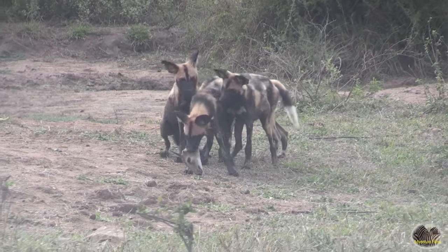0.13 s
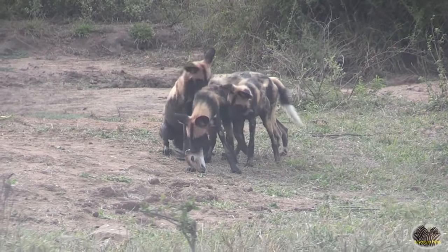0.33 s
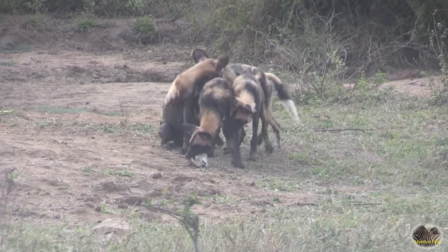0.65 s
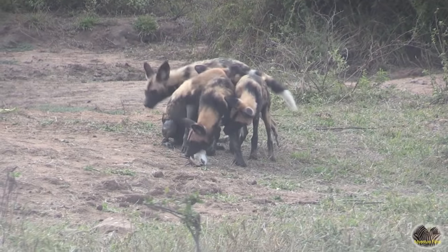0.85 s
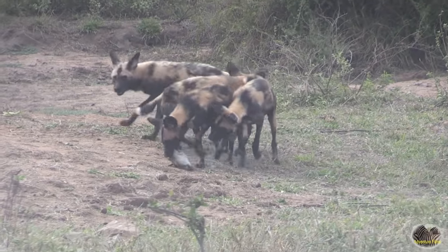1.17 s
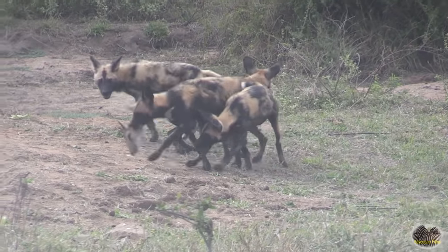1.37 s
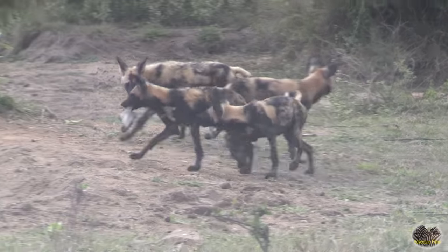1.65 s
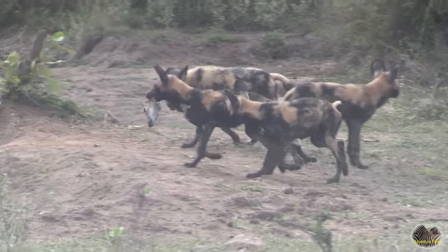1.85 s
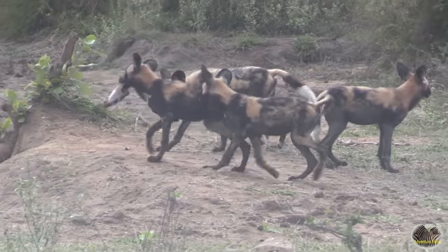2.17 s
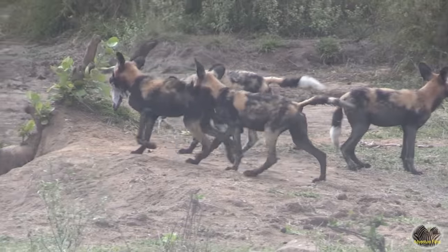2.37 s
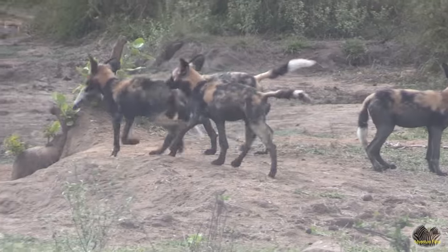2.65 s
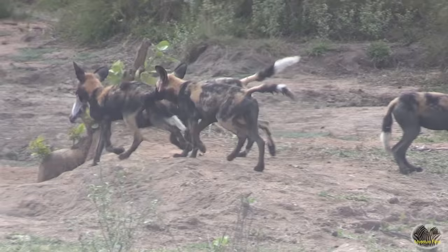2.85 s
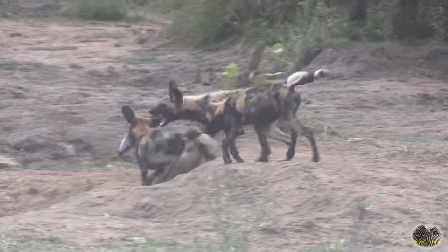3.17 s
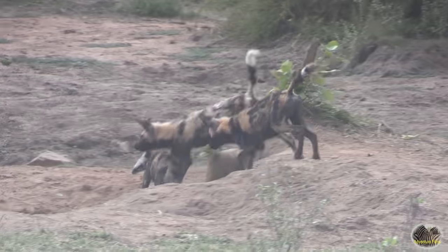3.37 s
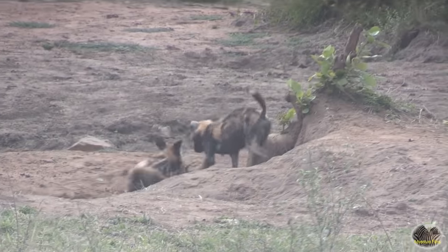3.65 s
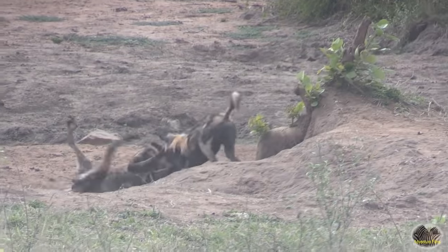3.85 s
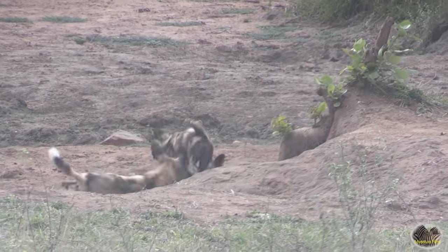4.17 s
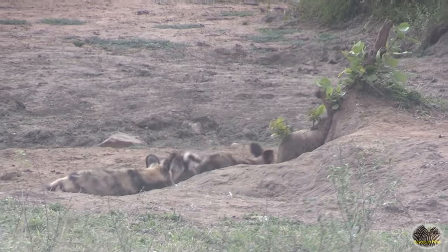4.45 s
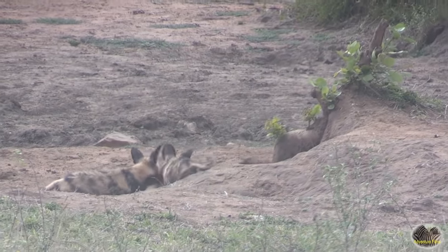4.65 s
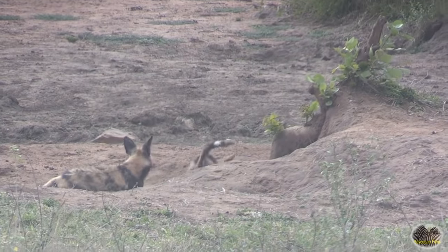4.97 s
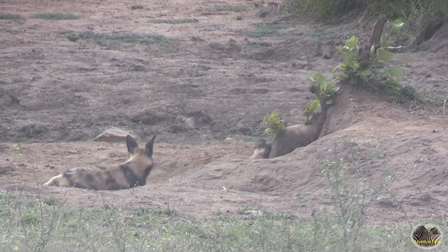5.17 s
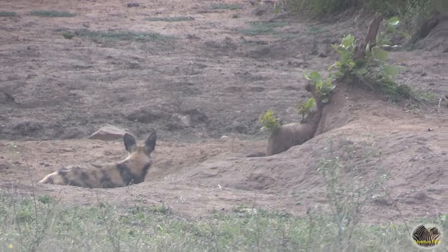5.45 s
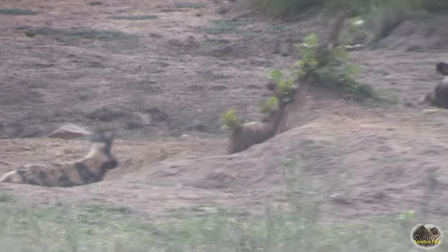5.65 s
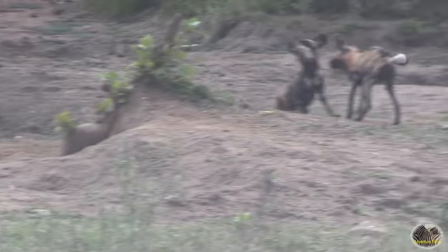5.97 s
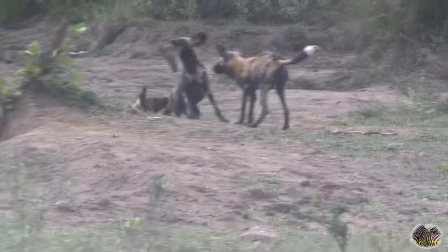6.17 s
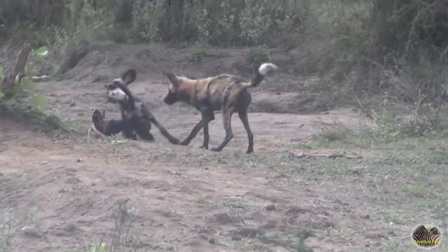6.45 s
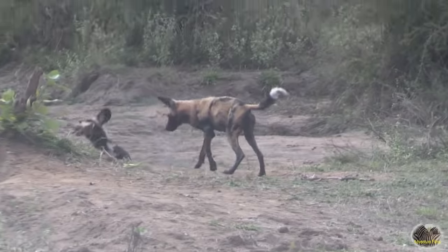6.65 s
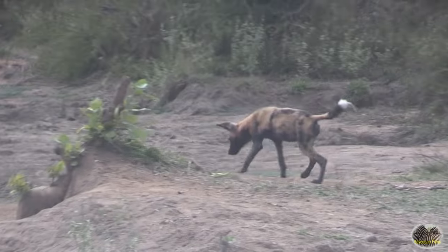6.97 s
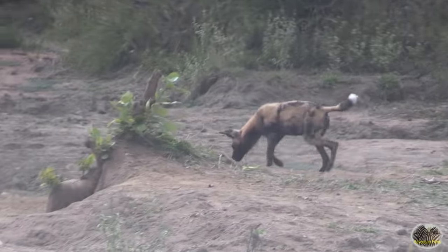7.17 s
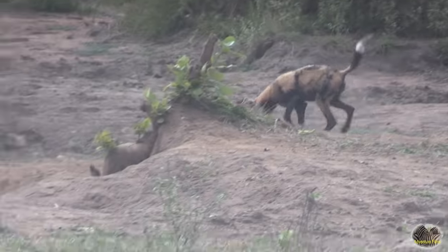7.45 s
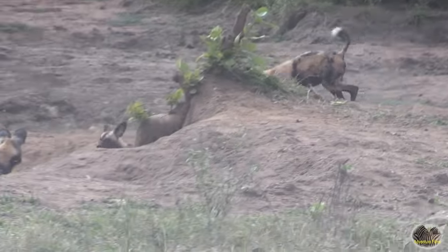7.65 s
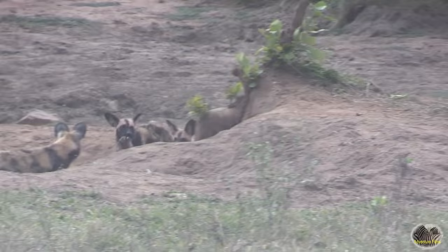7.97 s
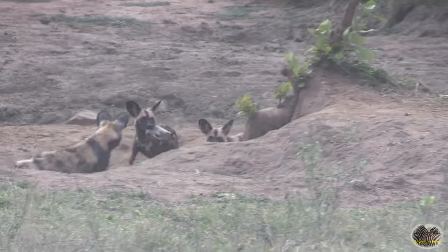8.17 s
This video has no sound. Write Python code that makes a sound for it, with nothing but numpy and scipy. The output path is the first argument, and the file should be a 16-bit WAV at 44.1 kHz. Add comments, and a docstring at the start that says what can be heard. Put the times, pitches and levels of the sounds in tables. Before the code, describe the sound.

Quiet windy bush with distant dog whines and bird pips, then from six seconds a loud repeating duet of clear whistles and harsh rasping squawks.

```python
"""Wind buffets the microphone over a steady hum and hiss: shaped noise, pure tones and bands of noise.
Far wild dogs whine from the start, in sliding overtones; small birds add chirps, slides, throbs and pips.
Light scuffs ring a few short modes. From about six seconds two ground birds call a loud duet in open bush:
one whistles in clear sliding sines, the other rasps in rough pulses through its throat, with brief yelps."""
import sys
import numpy as np
from scipy import signal
from scipy.fft import rfft, irfft
from scipy.io import wavfile
from scipy.ndimage import uniform_filter1d

SR = 44100
rng = np.random.default_rng(int(sys.argv[2]) if len(sys.argv) > 2 else 0)


def invert_db(level):
    """Linear amplitude ratio for a level in decibels (20 dB per decade), elementwise."""
    return 10 ** (np.asarray(level, dtype=float) / 20)


def generate_wav(signal):
    """Clip the signal to [-1, 1] and save it as 16-bit WAV at the path in sys.argv[1]."""
    frames = np.transpose(np.atleast_2d(signal))
    scaled = np.clip(frames, -1, 1) * 32767
    pcm = np.round(scaled).astype(np.int16)
    wavfile.write(sys.argv[1], SR, pcm)


N = 366471  # length in samples

# spectrum of the wind's low rumble: (f/Hz, relative level/dB per Hz)
RUMBLE_SPECTRUM = [(7.1, -21.5), (12, -5.5), (22, -7), (43, -0.5), (59, -7), (86, -9.5), (100, -29),
                   (130, -38), (220, -120)]
# spectrum of the flutter above it: (f/Hz, relative level/dB per Hz)
FLUTTER_SPECTRUM = [(35, -48), (60, -10), (113, -3), (258, -21), (520, -47.5), (700, -43.5), (910, -65.5),
                    (1540, -120)]
# rumble before gusts and pushes: (t/s, level/dB)
RUMBLE_LEVEL = [(0.0, -48.5), (0.04, -41), (0.42, -44), (0.44, -37), (0.74, -48), (2.61, -49), (2.71, -61),
                (2.78, -45), (4.79, -42.5), (4.98, -29.5), (5.05, -34.5), (5.37, -29.5), (5.65, -31),
                (5.69, -44), (5.76, -31), (5.78, -45), (5.83, -30.5), (6.11, -45), (6.18, -29.5),
                (6.37, -37), (7.57, -33.5), (7.73, -49.5), (7.8, -35), (8.31, -47.5)]
# flutter before gusts and pushes: (t/s, level/dB)
FLUTTER_LEVEL = [(0.0, -64), (0.21, -47), (0.64, -59.5), (3.01, -63.5), (3.59, -47), (3.68, -59.5),
                 (4.77, -48), (4.81, -55), (4.86, -33), (5.05, -33), (5.11, -55), (5.23, -31.5),
                 (5.85, -36), (5.88, -30), (6.06, -54), (6.32, -31.5), (6.46, -51), (6.53, -38),
                 (7.24, -42), (7.29, -52), (7.41, -37), (8.17, -56.5), (8.22, -41.5), (8.31, -50)]
# strongest pushes of wind: (t/s, length/s, rise/dB)
PUSHES = [(0.437, 0.027, 7), (2.44, 0.039, 5.5), (3.056, 0.047, 5), (3.694, 0.045, 7), (4.025, 0.053, 9.5),
          (4.144, 0.076, 9), (4.46, .06, 4), (4.703, 0.031, 10.5), (4.86, 0.0355, 4.5), (5.339, 0.036, 7.5),
          (5.443, 0.045, 7.5), (5.618, 0.082, 4), (5.762, 0.03, 11), (5.823, 0.027, 4.5), (6.196, 0.045, 1),
          (6.642, 0.071, 6), (6.857, 0.082, 3.5), (7.041, 0.053, 8), (7.51, 0.14, 1.5), (7.98, 0.055, 5)]
# spectrum of the far wash of the bush: (f/Hz, relative level/dB per Hz)
WASH_SPECTRUM = [(76, -60), (130, -39.5), (191, 2.5), (238, -11), (268, -5), (342, -3.5), (394, -8.5),
                 (511, -9), (846, -16), (1080, -19.5), (1430, -25), (2220, -28), (16000, -32.5)]
# steady bands of noise: (f/Hz, width/Hz, level/dB)
HUMMING_BANDS = [(275.4, 6, -74), (2300, 450, -76.5)]
# steady tones: (f/Hz, level/dB)
HUM_TONES = [(518, -70.5), (1050, -72)]
# dogs: (even against odd overtones/dB, brightness/dB per overtone, [(t/s, f/Hz, level/dB)])
DOG_WHINES = [(1.2, -4.5, [(0.0, 2490, -52), (.012, 2170, -52), (.048, 1694, -57), (.09, 1470, -57),
              (.12, 1420, -68)]), (1, -0.04, [(3.61, 2200, -76), (3.618, 2233, -65), (3.64, 1920, -63),
              (3.712, 1483, -68.5), (3.744, 1440, -73), (3.76, 1272, -85)]), (-5, 0.3, [(3.88, 1447, -90),
              (3.892, 1443, -68), (3.918, 1455, -69), (3.954, 1470, -66), (4.03, 1175, -73)])]
# colour of the dogs' overtones: (f/Hz, level/dB)
MUZZLE_COLOUR = [(2400, -8), (3000, -7.5), (4400, -1.5), (5200, 2.5), (6000, -6), (7300, -3.5), (8800, -13),
                 (11000, -37)]
# far birds' falling notes: (t/s, length/s, start f/Hz, end f/Hz, level/dB, loudest at share of length,
# power of time in the fall of pitch)
FAR_CHIRPS = [(0.707, .06, 3790, 3140, -71, .33, .9), (0.797, .1, 5500, 3950, -69, 0.91, 1.6),
              (1.029, 0.066, 3850, 2550, -68, .15, .6), (1.17, .065, 5550, 4812, -73, .4, .9),
              (1.245, .05, 3900, 3280, -72, .7, 1.1), (1.538, .04, 5083, 4800, -70, .5, 1.1),
              (1.84, 0.0661, 5441, 4490, -76, .4, 1.1), (2.11, .04, 5780, 5500, -73, .3, 1.1),
              (4.892, 0.078, 4100, 3120, -53, 0.35, 1), (4.971, 0.097, 6520, 4620, -54.5, 0.9, 0.92),
              (5.245, 0.043, 3850, 3483, -61.5, .15, .9), (5.522, 0.036, 3610, 3400, -49.5, 0.25, 1.9),
              (5.602, .037, 3650, 3478, -63, .22, 1.3), (5.65, 0.037, 3320, 2900, -47.5, 0.4, 2.8),
              (5.727, 0.029, 3440, 3270, -60, .6, .7), (5.783, .042, 2890, 2700, -51.5, 0.44, 1),
              (5.834, 0.079, 4940, 3900, -70, .8, 2.5)]
# faint quick slides of far birds: (t/s, length/s, start f/Hz, end f/Hz, middle level/dB)
FAR_SLIDES = [(2.018, 0.03398, 4670, 2900, -75), (2.273, .032, 4701, 3900, -72),
              (3.42, 0.073, 6005, 4763, -78), (3.437, 0.05, 4500, 3561, -75),
              (4.589, 0.012, 3870, 7400, -63.5), (4.62, .016, 3800, 7200, -65),
              (4.654, .018, 3800, 7600, -67), (4.689, .02, 3490, 7560, -67),
              (4.733, 0.022, 3800, 6600, -71), (4.958, .1, 3350, 2300, -77),
              (5.003, 0.023, 3900, 3500, -71), (5.06, 0.03, 4750, 3660, -65.5),
              (5.072, 0.075, 6300, 4740, -76), (5.282, 0.086, 7500, 4070, -70.5)]
# far throbbing notes: (t/s, length/s, start f/Hz, end f/Hz, width/Hz, throb rate/Hz, level/dB)
FAR_TRILLS = [(2.029, 0.31, 2950, 2760, 201, 105, -68), (3.247, 0.065, 2500, 2300, 500, 96, -63),
              (3.277, 0.06106, 2100, 1590, 400, 130, -70), (3.615, 0.06855, 2140, 1873, 400, 110, -70),
              (3.733, 0.12, 2300, 1834, 400, 107.27, -67), (4.035, .1, 2290, 2080, 400, 110, -73),
              (5.307, 0.14, 4440, 4387, 1820, 110, -66.5), (5.682, 0.095, 2300, 2550, 340, 140, -57.5),
              (5.827, 0.055, 2500, 2350, 350, 103.24, -56)]
# arched pips of a bird: (t/s at the top, length/s, top f/Hz, top level/dB)
BIRD_PIPS = [(2.278, 0.0428, 3270, -63), (2.377, 0.031, 3140, -60.5), (2.476, 0.031, 3150, -61),
             (2.889, 0.042, 3110, -56), (2.993, 0.043, 3200, -57), (3.091, 0.043, 3160, -59.5),
             (3.195, 0.044, 3130, -64.5)]
# small scuffs near the microphone: (t/s, peak level/dB)
SCUFFS = [(4.378, -47), (5.585, -54)]
# modes rung by each scuff: (f/Hz, level/dB, t60/s)
SCUFF_MODES = [(850, 0, .03), (1250, -3, .015), (1600, 0, .02), (2000, 0, .012), (2400, 1, .012),
               (5300, -6, .008)]
# second bird, rasps around each whistle and the chatter between:
# (t/s, kind, length/s, pulse f/Hz before the shape, effort/dB, lift/dB, brightness/dB per octave)
RASP_CALLS = [(5.969, "lead", 0.047, 632, -39, -8, -1), (6.081, "opening", 0.035, 594, -33, 2, -1),
              (6.12, "closing", 0.056, 516.4, -30, -2, 0.4), (6.254, "first", 0.042, 650, -29, 3.5, 2),
              (6.299, "second", 0.039, 570, -30, 0, 0.3), (6.339, "third", 0.073, 644, -33.5, -3, 2),
              (6.439, "fourth", 0.057, 525, -36, 2.5, -2.5), (6.498, "fifth", .045, 703, -42, 1, 1.3),
              (6.592, "lead", 0.034, 631, -34, -3, 1.5), (6.696, "opening", .035, 586, -33, -6, -0.5),
              (6.729, "closing", .065, 524, -30.5, -0.8, 1.2),
              (6.909, "first", 0.046, 616, -30.5, 2.5, 0.7), (6.953, "second", 0.039, 561.5, -32.5, 2.5, 0),
              (6.992, "third", 0.088, 651, -33, -4, 1.5), (7.103, "fourth", 0.048, 534.5, -34, 0.7, -2.7),
              (7.155, "fifth", 0.045, 531, -37.5, -1.5, 3.2), (7.232, "lead", .042, 625, -33.5, -5.5, -0.5),
              (7.347, "opening", 0.04, 648, -34, 4, .6), (7.38, "closing", .072, 532, -30, 2, 0.5),
              (7.57, "first", 0.044, 626.5, -29.5, 0.5, 1.5), (7.611, "second", .04, 578, -31, -1, -0.5),
              (7.651, "third", 0.097, 644, -34, -3, 2), (7.764, "fourth", 0.055, 520, -37.5, .1, -3.5),
              (7.813, "fifth", .05, 542, -43.5, .1, 1.3), (7.913, "lead", 0.049, 640, -36, 7, 3.5),
              (8.031, "opening", 0.038, 649, -34, 7, 1), (8.066, "closing", 0.067, 505, -29, -0.5, 1.2)]
# course of each kind: (share of length, pulse f ratio, effort/dB, lift of the strongest throat
# resonance/dB, brightness/dB per octave)
RASP_COURSES = { "lead": [(0, .93, -25.5, 4.5, -1), (.35, .96, -10, 3.5, 1.5), (.6, 1.001, 0, 3, -1),
                (1, 1.01, -28.5, -9, 8)], "opening": [(0, .97, -19, 1, -12), (.3, .97, -4, 6, 0.5),
                (.55, 1.03, 0, -14, 2), (.78, 1.04, -7, -3, 4), (1, 1.05, -21, 1.5, 6)],
                "closing": [(0, 1.02, -13, 5.5, 6.5), (.12, 1.01, -6, 3, 1), (.25, 1.001, -2, -3, -3),
                (.62, 1.06, -13, 3, -1), (1, 1.02, -43.5, -3, -15)], "first": [(0, .87, -32, 6.5, 2),
                (.21, .87, -8.5, -8.5, -4.2), (.56, 1.001, 0, 5, 3), (.78, .95, -1.5, -2, 2),
                (1, 0.83, -13, -6, 1)], "second": [(0, 1.03, -19, -4.5, 12), (.18, 1.01, -6.5, 2, 4.5),
                (.37, 1.001, 0, 3.5, 1.7), (1, 1.02, -12, -1, .1)], "third": [(0, 1.001, -5, 1, -3),
                (.12, 1.01, 2, 12, -1.5), (.3, 1.001, 0, 12, 0), (.72, .87, -1.5, 4.7, -3.5),
                (1, .9, -22, 12, -7.5)], "fourth": [(0, 1.03, -21.5, -1, -6.5), (.17, 1.001, -2.5, -2, 1),
                (.67, 1.04, -2, 6, 3.5), (1, 0.96, -14.5, 4.5, 0)], "fifth": [(0, 0.85, -9.5, 1.1, -11),
                (.4, 1.001, -0.5, -1.1, -6.5), (.62, 1.001, -3.5, -2.5, -2.5), (1, 1.001, -18.5, 9, -15)]}
# resonances of the rasping throat: (f/Hz, width/Hz, level/dB)
THROAT_RESONANCES = [(793, 440, -24.5), (1430, 690, -18), (2550, 516, -2.5), (3110, 980, -7),
                     (3800, 790, -1), (4750, 570, -8.5), (5690, 770, -13), (6980, 1360, -24),
                     (8500, 1600, -27.5), (10800, 3300, -34.5), (13800, 2300, -48)]
# first bird: (t/s, length/s, top f/Hz, settled f/Hz, both before a 1 % lowering, level/dB,
# fade over the call/dB, brightness/dB per overtone)
WHISTLE_CALLS = [(5.991, 0.125, 2505, 2420, -28.5, -2.5, 3.5), (6.61, 0.14, 2553, 2407, -21.5, -2.5, 0.3),
                 (7.253, .123, 2556, 2421, -21.5, -1.5, 0.1), (7.936, 0.11, 2556, 2425, -20.5, -0.5, 0.1)]
# course of a whistle: (share of length, share of the way from settled to top f,
# levels of overtones 1 to 4/dB)
WHISTLE_COURSE = [(0, 0.56, -7.5, -36.5, -28, -63.5), (0.101, 1, -3.5, -7, -27.5, -55),
                  (.3, 0.317, -1.5, -11, -28.5, -50), (.46, 0.068, -1.5, -13.5, -36, -50),
                  (.7, -.1, -10, -10, -37.5, -60), (.87, -0.11, -10, -17.5, -40, -56),
                  (1, -0.65, -5.5, -22.5, -33, -55)]
# second bird's hoarse glides: (t/s, length/s, start f/Hz, end f/Hz, middle level/dB)
HOARSE_BREAKS = [(6.095, 0.0054, 4130, 3000, -43), (6.274, 0.017, 2850, 2960, -30.5),
                 (6.301, 0.021, 4650, 3080, -44), (6.746, 0.0145, 4260, 3430, -34),
                 (6.921, 0.019, 2820, 3110, -32), (6.965, 0.016, 4420, 3300, -31.5),
                 (7.391, 0.022, 4210, 3410, -34.5), (7.58, 0.025, 2830, 3120, -31),
                 (7.62, 0.017, 4380, 3280, -33), (8.054, 0.033, 4250, 3040, -35.5)]
# second bird's clear moments: (t/s, kind, length/s, f/Hz before the shape, level/dB, fade/dB,
# brightness/dB per overtone)
YELP_CALLS = [(6.098, "rising", 0.04, 2088, -31, -9, 2), (6.278, "falling", 0.038, 2420, -23, -1, 0.8),
              (6.708, "rising", 0.042, 2159, -30, -5, 0.8), (6.934, "falling", .033, 2390, -26.5, 7, 1.5),
              (7.357, "rising", 0.039, 2135, -31.5, -3, -1), (7.597, "falling", 0.034, 2415, -22.5, 3, -.3),
              (8.044, "rising", 0.036, 2124, -32.5, 2.5, -0.5)]
# course of each kind: (share of length, f ratio, levels of overtones 1 to 5/dB)
YELP_COURSES = { "rising": [(0, .92, -12, -13, -33, -47.5, -52), (.15, .97, 0, -9, -11.5, -38, -41),
                (.35, 1.001, -1, -1.5, -7.5, -19, -45), (.7, 1.002, -5.5, -1.5, -14, -24, -49),
                (1, .98, -6, 7, -20, -42, -57)], "falling": [(0, 1.005, -21, -11.5, -25, -51, -52),
                (.35, 1.001, -9.5, -1, -24, -28.5, -45), (.7, .98, -20, -14, -28, -39, -44),
                (1, .96, 0, -16, -33, -46, -60)]}

GUST_DB, GUST_TILT_DB = 1.2, 2.5  # random gusts of the rumble and of the flutter
CREST = 3  # ceiling toward which wind pressure is rounded off, in rms
WASH_DB, HISS_DB = -59.5, -70.5
WHINE_BREATH_DB = -7  # air noise around each overtone
CHIRP_START_DB, CHIRP_END_DB = -14, -9.5  # against the loudest point
PIP_DROP_HZ, PIP_FADE_DB = 745, 18  # fall of pitch and level toward both ends
RASP_JITTER, RASP_BREATH = .03, .36  # unsteadiness of pulse rate (ratio), share of air noise
RASP_FLICKER_DB, RASP_LUMPS_DB = 3.5, 1.8  # unsteadiness of overtones and of overall drive
WHISTLE_LUMPS_DB = 1.2  # unsteady level
WHISTLE_WAVER, YELP_WAVER, WHINE_WAVER = .002, .005, .022  # pitch unsteadiness as a ratio
CHIRP_WAVER, SLIDE_WAVER, BREAK_WAVER = .009, .022, .01
EDGE_S = .006  # soft start and end of a call together
GROUND_S, GROUND_DB = .00376, -13  # bounce off the ground
ECHO_DB, ECHO_T60, ECHO_RISE_S = -26.5, 0.47, 0.039  # scatter off the bushes, near
FAR_ECHO_DB, FAR_T60, FAR_RISE_S = -10.5, .25, 0.016  # the same, far


def evened(x):
    """Scales to rms 1."""
    return x / np.sqrt(np.mean(x ** 2) + 1e-20)


def drift(shape, span):
    """Random swings of rms 1, smoothed over a span of samples."""
    return evened(uniform_filter1d(rng.standard_normal(shape), span))


def add(mix, s, sound):
    """Mixes a sound in at a time."""
    part = mix[round(s * SR):][:len(sound)]
    part += sound[:len(part)]


def columns(rows):
    """A table read out at every sample, and a window that softens its ends."""
    s, *rest = np.transpose(rows)
    t = np.arange(s[0], s[-1], 1 / SR)
    edge = signal.windows.tukey(len(t), min(1, EDGE_S * SR / len(t)))
    return edge, [np.interp(t, s, c) for c in rest]


def resonate(x, hz, width):
    """Shifts the curve hz down to zero, smooths twice, shifts back: a steep resonance of gain 1."""
    turn = np.exp(2j * np.pi * np.cumsum(hz * np.ones(len(x))) / SR)
    r = np.exp(-np.pi * width / SR)
    return 2 * (turn * signal.lfilter([(1 - r) ** 2], [1, -2 * r, r * r], x / turn)).real


def coloured(points):
    """Noise of rms 1 with a given spectrum."""
    hz = np.fft.rfftfreq(N, 1 / SR)
    f, db = np.transpose(points)
    shape = invert_db(np.interp(np.log(hz + 1), np.log(f + 1), db, left=-100, right=-100))
    return evened(irfft(rfft(rng.standard_normal(N)) * shape, N))


def tone(rows, first=1, waver=0.011):
    """A clear voice: sines on the overtones of a slightly wavering pitch."""
    edge, (hz, *levels_db) = columns(rows)
    phase = 2 * np.pi * np.cumsum(hz * (1 + waver * drift(len(hz), 60))) / SR
    voice = sum(invert_db(db) * np.sin((first + k) * phase) for k, db in enumerate(levels_db))
    return edge * np.sqrt(2) * voice


def call(shape, length, hz, db, fade_db, bright_db, count):
    """Stretches a shared shape to one call: its pitch, and its level on the first count dB columns."""
    share, ratio, *rest = np.transpose(shape)
    levels = [c + (db + fade_db * share + bright_db * k) * (k < count) for k, c in enumerate(rest)]
    return np.transpose([share * length, ratio * hz, *levels])


def wind():
    """Lumpy low rumble that gusts at random and in a few strong pushes; a higher flutter rides on it."""
    t = np.arange(N) / SR
    lumps = evened(uniform_filter1d(drift((2, N), 900), 900))
    gusts = evened(uniform_filter1d(drift((2, N), 3000), 3000))
    push_db = sum(db * np.exp(-(2 * (t - at) / length) ** 2) for at, length, db in PUSHES)
    rumble_swing_db = 1.2 * lumps[0] + GUST_DB * gusts[0]
    # the flutter also follows the lumps of the rumble
    flutter_swing_db = 0.93 * lumps[1] + 4.1 * lumps[0] + GUST_TILT_DB * gusts[1]
    rumble = evened(coloured(RUMBLE_SPECTRUM) * invert_db(rumble_swing_db))
    flutter = evened(coloured(FLUTTER_SPECTRUM) * invert_db(flutter_swing_db))
    rumble, flutter = CREST * np.tanh(rumble / CREST), CREST * np.tanh(flutter / CREST)
    rumble_db = np.interp(t, *np.transpose(RUMBLE_LEVEL))
    flutter_db = np.interp(t, *np.transpose(FLUTTER_LEVEL))
    return invert_db(rumble_db + push_db) * rumble + invert_db(flutter_db + .5 * push_db) * flutter


def background():
    """The far wash of the bush with humming bands and slightly wavering tones."""
    bands = sum(invert_db(db) * evened(resonate(rng.standard_normal(N), hz, width))
                for hz, width, db in HUMMING_BANDS)
    turns = np.cumsum(1 + 0.002 * drift(N, 3000)) / SR  # turns of a 1 Hz tone, shared by all
    hum = sum(invert_db(db) * np.sqrt(2) * np.sin(2 * np.pi * hz * turns) for hz, db in HUM_TONES)
    return invert_db(WASH_DB) * coloured(WASH_SPECTRUM) + bands + hum


def whine(even_db, bright_db, rows):
    """Overtones 2 to 5 of a sliding pitch, coloured by the muzzle, each with breath around it."""
    f, colour_db = np.transpose(MUZZLE_COLOUR)
    k = np.arange(2, 6)
    tilt_db = even_db * (k % 2 == 0) + bright_db * k
    voiced = [(s, hz, *(db + tilt_db + np.interp(k * hz, f, colour_db))) for s, hz, db in rows]
    voice = tone(voiced, first=2, waver=WHINE_WAVER)
    return voice * (1 + invert_db(WHINE_BREATH_DB) * drift(len(voice), 30))


def chirp(length, start_hz, end_hz, db, loudest, bend):
    """A falling note that swells to its loudest point and fades."""
    u = np.linspace(0, 1, num=21)
    level_db = db + np.interp(u, [0, loudest, 1], [CHIRP_START_DB, 0, CHIRP_END_DB])
    hz = start_hz + (end_hz - start_hz) * u ** bend
    return tone(np.transpose([u * length, hz, level_db]), waver=CHIRP_WAVER)


def slide(length, start_hz, end_hz, db, waver):
    """A short, slightly hoarse glide, a little louder at its start."""
    middle = (length / 2, (start_hz + end_hz) / 2, db)
    return tone([(0, start_hz, db + 2.5), middle, (length, end_hz, db)], waver=waver)


def trill(length, start_hz, end_hz, width, throbs, db):
    """A gliding whistle and its breath, cut into throbs at a steady rate."""
    t = np.arange(0, length, 1 / SR)
    hz = np.linspace(start_hz, end_hz, len(t))
    whistled = np.sin(2 * np.pi * np.cumsum(hz) / SR) * 300 / width  # the narrower, the clearer
    breath = evened(resonate(rng.standard_normal(len(t)), hz, width))
    throb = np.sin(np.pi * throbs * t) ** 4 + width / 3000  # wide buzzes blur
    return invert_db(db) * evened(throb * (whistled + .5 * breath)) * signal.windows.tukey(len(t), .3)


def pip(length, top_hz, db):
    """A whistle that arches up and down, loudest at its top."""
    u = np.linspace(-1, 1, num=15)
    hz, level_db = top_hz - PIP_DROP_HZ * u ** 2, db - PIP_FADE_DB * u ** 2
    return tone(np.transpose([(u + 1) * length / 2, hz, level_db]))


def scuff(peak_db):
    """A light brush of noise rings a few short modes."""
    t = np.arange(2000) / SR
    ring = sum(invert_db(db - 60 * t / t60) * np.sin(2 * np.pi * hz * t) for hz, db, t60 in SCUFF_MODES)
    sound = np.convolve(np.hanning(1400) * rng.standard_normal(1400), ring)
    return invert_db(peak_db) * sound / abs(sound).max()


def rasp(kind, length, rate_hz, effort, lift, bright):
    """Unsteady pulses, whose overtones flicker, and puffs of air ring the resonances of the throat."""
    rows = call(RASP_COURSES[kind], length, rate_hz, effort, 0, 0, count=1) + [0, 0, 0, lift, bright]
    edge, (pulse_hz, effort_db, lift_db, bright_db) = columns(rows)
    n = len(edge)
    turns = np.cumsum(pulse_hz * (1 + RASP_JITTER * drift(n, 120))) / SR
    orders = np.arange(1, 29)[:, None]
    flicker = drift((len(orders), n), 300)
    spread = .6 * rng.random(orders.shape)  # overtones out of step: smeared pulses, no sharp spikes
    pulses = (invert_db(RASP_FLICKER_DB * flicker) * np.cos(2 * np.pi * (orders * turns + spread))).sum(0)
    drive = (1 - RASP_BREATH) * evened(pulses) + RASP_BREATH * rng.standard_normal(n)
    drive *= invert_db(RASP_LUMPS_DB * drift(n, 70))
    out = 0
    for k, (hz, width, db) in enumerate(THROAT_RESONANCES):
        strongest = k == 2
        tilt_db = bright_db * np.log2(hz / 3500) + lift_db * strongest
        # the strongest one leans toward the fourth overtone
        centre_hz = hz + strongest * 0.43 * (4 * pulse_hz - hz)
        out = out + (-1) ** k * invert_db(db + tilt_db) * evened(resonate(drive, centre_hz, width))
    return edge * invert_db(effort_db) * out


def whistle(length, top_hz, settled_hz, *level):
    """The pitch hops up to its top, slides to where it settles, and sags at the end."""
    shape = [(u, settled_hz + way * (top_hz - settled_hz), *levels)
             for u, way, *levels in WHISTLE_COURSE]
    voice = tone(call(shape, length, 0.99, *level, count=4), waver=WHISTLE_WAVER)
    lumps = uniform_filter1d(drift(len(voice), 250), 250)
    return voice * invert_db(WHISTLE_LUMPS_DB * evened(lumps - lumps.mean()))


def yelp(kind, *note):
    """A brief clear voice of five overtones on a bending pitch."""
    return tone(call(YELP_COURSES[kind], *note, count=5), waver=YELP_WAVER)


def bush(x, echo_db, t60, rise_s):
    """One ground bounce, then sparse scattered echoes, duller than the direct sound."""
    t = np.arange(SR) / SR
    taps = np.zeros(SR)
    at = np.arange(300, SR - 20, 20)
    taps[at + rng.integers(0, 20, len(at))] = rng.choice([-1., 1.], len(at))
    tail = signal.lfilter([1], [1, -.3], taps) * invert_db(-60 * t / t60)
    tail *= 1 - np.exp(-t / rise_s)  # builds up as farther bushes answer
    tail *= invert_db(echo_db) / np.linalg.norm(tail)
    tail[0], tail[round(GROUND_S * SR)] = 1, invert_db(GROUND_DB)
    return signal.fftconvolve(x, tail)[:N]


def scene():
    """All calls and scuffs pass through the bush; both channels get the same sound."""
    near, far = np.zeros((2, N))
    for *colour, rows in DOG_WHINES:
        add(far, rows[0][0], whine(*colour, rows))
    for s, *note in FAR_CHIRPS:
        add(far, s, chirp(*note))
    for s, *note in FAR_SLIDES:
        add(far, s, slide(*note, waver=SLIDE_WAVER))
    for s, *note in FAR_TRILLS:
        add(far, s, trill(*note))
    for s, length, *note in BIRD_PIPS:
        add(near, s - length / 2, pip(length, *note))
    for s, peak_db in SCUFFS:
        add(near, s, scuff(peak_db))
    for s, *note in RASP_CALLS:
        add(near, s, rasp(*note))
    for s, *note in WHISTLE_CALLS:
        add(near, s, whistle(*note))
    for s, *note in HOARSE_BREAKS:
        add(near, s, slide(*note, waver=BREAK_WAVER))
    for s, *note in YELP_CALLS:
        add(near, s, yelp(*note))
    calls = bush(near, ECHO_DB, ECHO_T60, ECHO_RISE_S) + bush(far, FAR_ECHO_DB, FAR_T60, FAR_RISE_S)
    return np.tile(calls + wind() + background(), (2, 1))


def top_cut(x):
    """Nothing passes above the cut-off."""
    return signal.sosfilt(signal.butter(12, 16280, fs=SR, output="sos"), x)


def record(dry):
    """Each channel adds its own hiss."""
    mix = dry + invert_db(HISS_DB) * rng.standard_normal(dry.shape)
    return top_cut(mix)


dry = scene()
out = record(dry)
generate_wav(out)
```